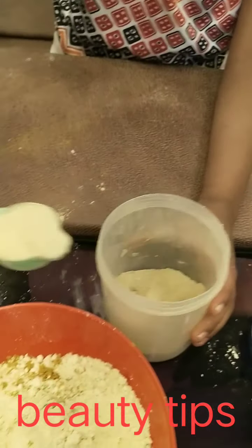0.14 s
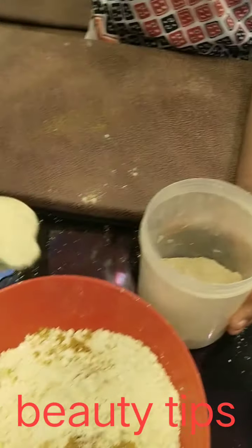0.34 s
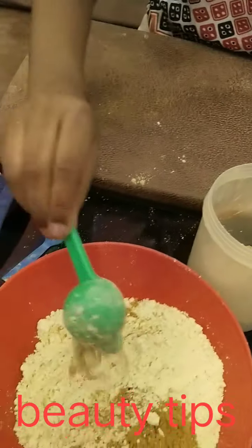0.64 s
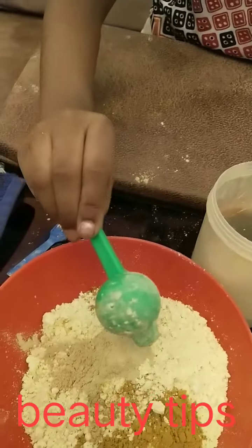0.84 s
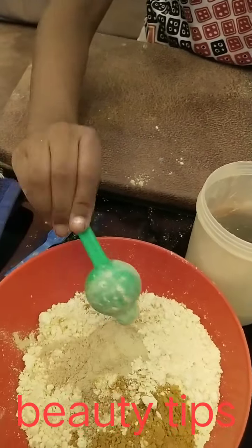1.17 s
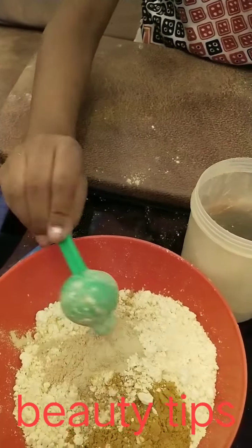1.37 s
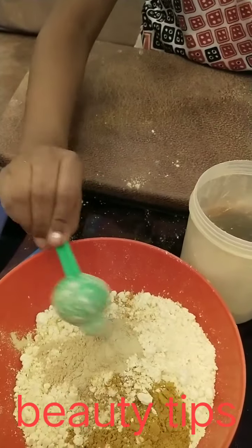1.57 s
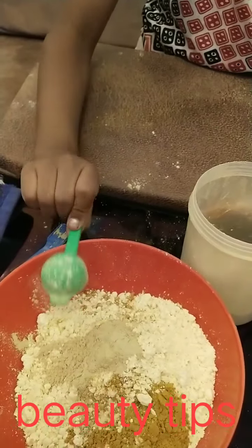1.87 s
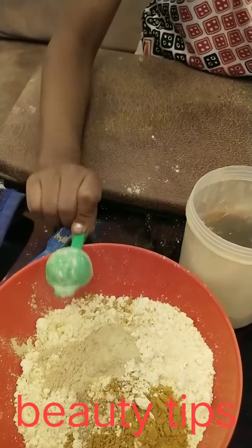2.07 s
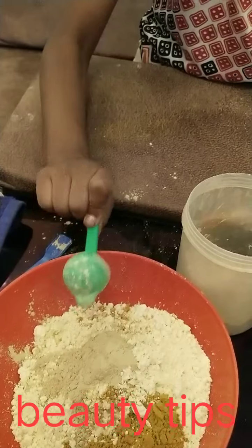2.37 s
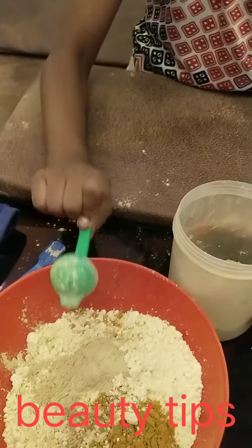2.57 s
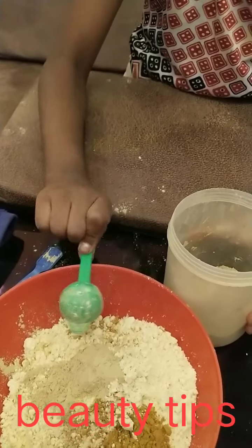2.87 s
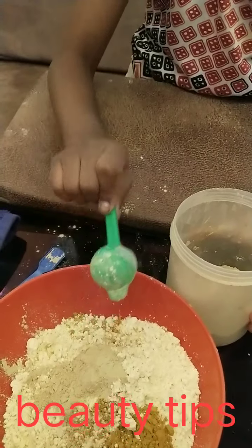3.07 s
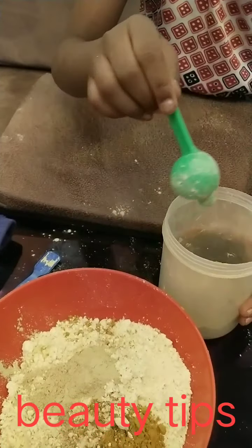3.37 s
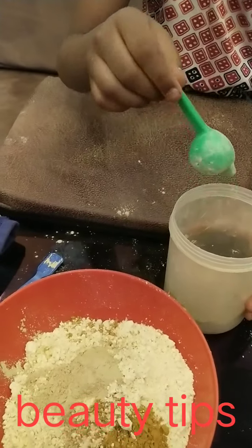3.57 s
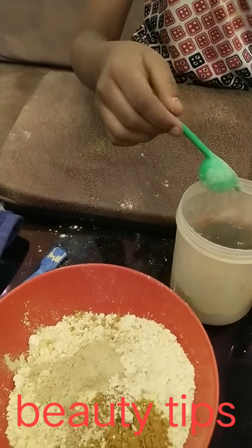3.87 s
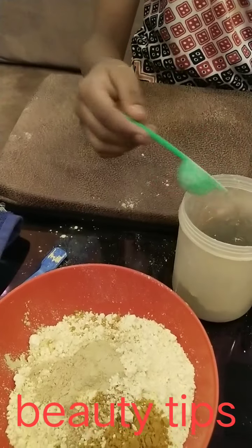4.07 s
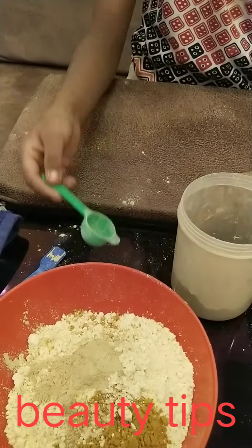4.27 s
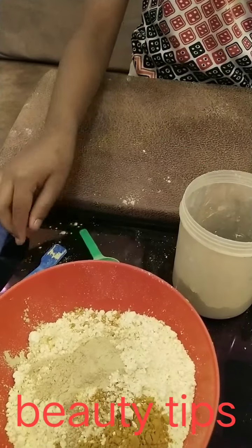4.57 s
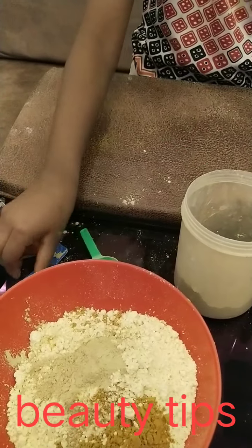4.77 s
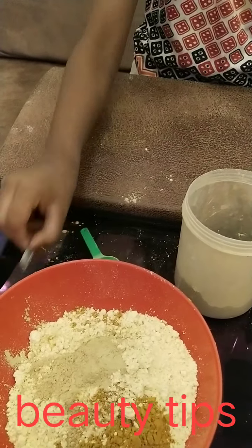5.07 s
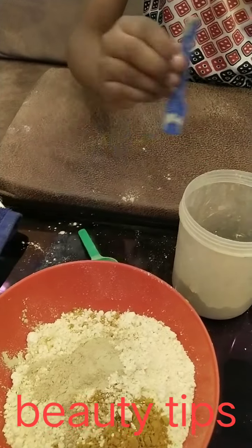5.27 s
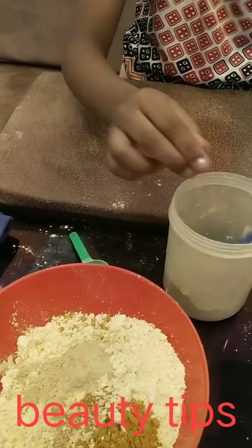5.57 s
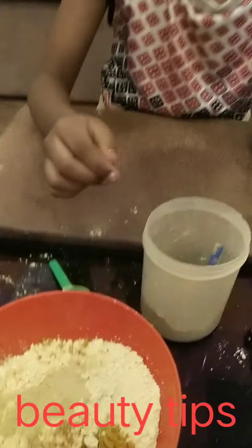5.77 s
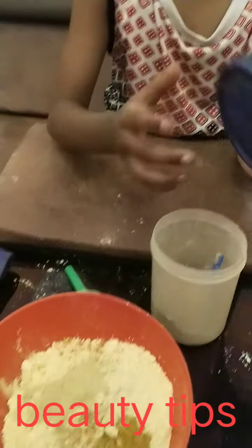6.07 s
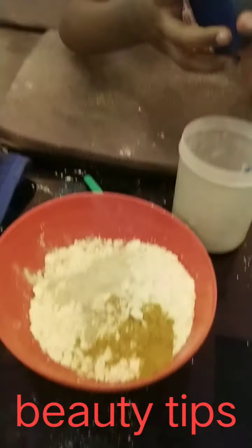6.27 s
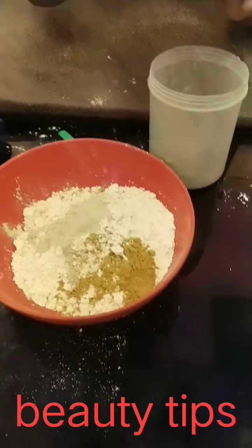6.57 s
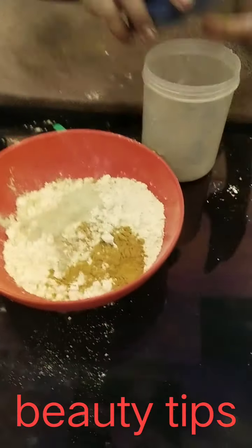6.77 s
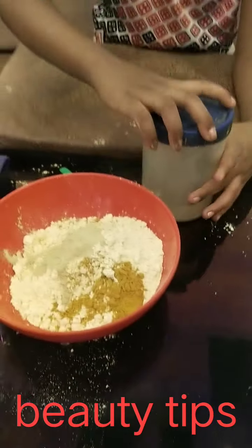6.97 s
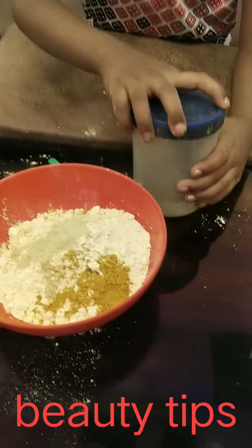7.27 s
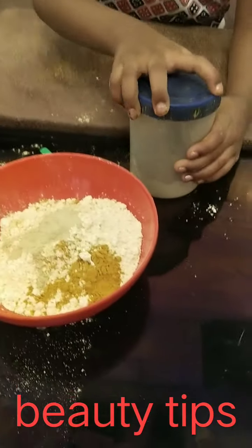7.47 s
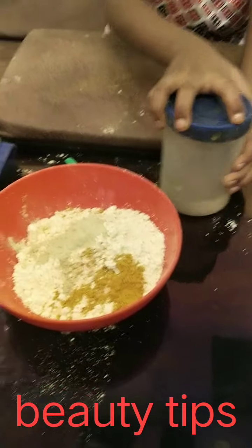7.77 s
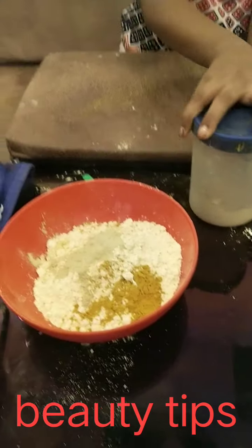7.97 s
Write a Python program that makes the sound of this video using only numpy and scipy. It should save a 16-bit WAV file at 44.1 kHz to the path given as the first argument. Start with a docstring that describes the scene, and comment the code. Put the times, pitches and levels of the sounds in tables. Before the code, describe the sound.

A plastic spoon taps a bowl of powder and drops on a table, then a lid is fumbled onto a plastic jar.

```python
"""A plastic spoon taps the rim of a bowl of powder, then drops and bounces on the table. A small scoop
clatters as it is picked up, and a lid is fumbled onto a plastic jar. Each blow rings the body's modes,
cracks at the contact and chatters. Hands and cloth rustle close by, with dry ticks and dull finger bumps.
An appliance hums and whines faintly over the hiss and rumble of a small hard-walled room."""
import sys
import numpy as np
from scipy import signal
from scipy.io import wavfile

SR = 44100
rng = np.random.default_rng(int(sys.argv[2]) if len(sys.argv) > 2 else 0)


def output_pcm(signal):
    """Save a mono or channel-first signal as 16-bit PCM at the path in sys.argv[1].

    Samples are clipped to [-1, 1] before scaling.
    """
    pcm = np.clip(np.atleast_2d(signal).T, -1, 1) * 32767
    wavfile.write(sys.argv[1], SR, np.round(pcm).astype(np.int16))


N = 358312


def from_db(db):
    """Decibels to gain."""
    return 10 ** (np.asarray(db) / 20)


def rms_one(x):
    """Scale to unit rms."""
    return x / np.sqrt(np.mean(x ** 2) + 1e-20)


def in_time(rows):
    """A (time [s], value) curve at every sample."""
    return np.interp(np.arange(N) / SR, *np.transpose(rows))


def at_hz(rows, hz, column=1):
    """Read a table on a log-frequency axis."""
    return np.interp(np.log(hz), np.log(np.array(rows)[:, 0]), np.array(rows)[:, column])


def panned(pan_db):
    """Left and right gains, pan_db apart."""
    return from_db([[pan_db / 2], [-pan_db / 2]])


def bandpass(x, edges_hz):
    """Butterworth band, 12 dB per octave skirts."""
    return signal.sosfilt(signal.butter(2, edges_hz, "band", fs=SR, output="sos"), x)


def drift(rate_hz):
    """Slow random curve, unit rms."""
    hop = 40
    pole = np.exp(-2 * np.pi * rate_hz * hop / SR)
    slow = signal.lfilter([1], [1, -2 * pole, pole * pole], rng.standard_normal(N // hop + 2002))[2000:]
    return np.interp(np.arange(N) / hop, np.arange(len(slow)), rms_one(slow))


def bands(noise):
    """Yield (centre Hz, stereo band); neighbouring bands use independent mid/side noise pairs."""
    # left-right likeness: (frequency [Hz], correlation [0..1])
    likeness = [(30, 0.49), (130, 1), (290, 0.84), (640, 0.38), (1400, 0.023), (15000, 0.02)]
    # balance: (frequency [Hz], left-right [dB])
    balance = [(30, 5.5), (200, 0.7), (1000, 1), (4000, 3.5), (15000, 4)]
    edges_hz = np.geomspace(25, 17500, 20)
    for k, (low, high) in enumerate(zip(edges_hz, edges_hz[1:])):
        mid, side = bandpass(noise[k % 2], [low, high])
        hz = np.sqrt(low * high)
        alike = at_hz(likeness, hz)
        stereo = np.sqrt(1 + alike) * mid + np.sqrt(1 - alike) * side * [[1], [-1]]
        yield hz, stereo * panned(at_hz(balance, hz))


def movement_gain(hz):
    """Rustle gain at one frequency: hand and cloth movements swell and fade, their powers add."""
    # (peak time [s], level [dB], 20 dB swell [s], 20 dB fade [s], tilt [dB/octave])
    moves = [(0.02, -67.5, 0.24, 0.62, 5), (0.38, -69, 0.19, 0.33, 3), (0.735, -63.5, 0.16, 0.1, -0.2),
             (1.04, -73, 0.05, .08, 6), (2.70, -64.5, 0.15, 0.22, -0.7), (3.57, -72, 0.51, .2, -2.5),
             (3.72, -64, 0.42, 0.23, -0.3), (4.595, -62.5, 0.022, 0.13, .1), (4.71, -63, 0.17, 0.14, -1.5),
             (4.93, -66, 0.13, .12, -0.5), (5.025, -63.5, 0.044, 0.07, 0.8), (5.22, -54, 0.11, 0.12, -1),
             (5.412, -50.5, 0.074, 0.073, 1.3), (5.69, -58, 0.23, 0.38, 4), (5.83, -42, 0.051, 0.036, 1.5),
             (6.03, -60.5, 0.36, 0.17, 2), (6.11, -59, 0.13, 0.33, 3), (6.525, -39.5, 0.084, 0.097, -2.5),
             (6.60, -64, .5, 0.38, 1), (6.75, -51.5, 0.12, 0.13, 1.3), (6.92, -52.5, 0.09, 0.14, 0.2),
             (7.18, -48, 0.02, 0.067, 1), (7.36, -51.5, 0.45, 0.26, -0.5), (7.69, -62.5, 0.13, 0.091, -1.5),
             (7.955, -56, 0.23, 0.17, -1.3), (8.03, -58.5, .1, .3, -0.5)]
    t = np.arange(0, N / SR + .004, .004)
    peak_s, db, swell_s, fade_s, tilt_db = np.transpose(moves)[:, :, None]
    drop_db = 20 * np.maximum((peak_s - t) / swell_s, (t - peak_s) / fade_s)
    gains = from_db(db + tilt_db * np.log2(hz / 3000) - drop_db)
    return np.interp(np.arange(N) / SR, t, np.sqrt(np.sum(gains ** 2, axis=0)))


def rustle():
    """Skin and cloth rub: grainy, flickering noise with one bright resonance."""
    # spectrum: (frequency [Hz], relative density [dB])
    colour = [(180, -29), (300, -39), (418, -45), (678, 0), (842, -2), (1430, -6), (2650, -6),
              (3700, -11.5), (5200, -12), (7400, -17), (14500, -24), (16000, -45.5)]
    grains = rng.standard_normal((2, 2, N)) * from_db(2.3 * rng.exponential(1, N))
    layers = [(hz, band * from_db(at_hz(colour, hz) + 1.4 * drift(42.6))) for hz, band in bands(grains)]
    rubbing = sum(movement_gain(hz) * band for hz, band in layers)
    rubbing /= np.std(sum(band for _, band in layers))
    return rubbing + signal.lfilter(*signal.iirpeak(6400, Q=6.6, fs=SR), rubbing)


def rumble():
    """Low noise, each band wandering slightly in level."""
    # envelope: (time [s], level [dB])
    level = [(0.0, -58.5), (1.3, -58.5), (2.05, -55.5), (3.1, -59), (4.14, -57), (4.9, -59.5), (5.3, -55.5),
             (6.0, -55), (6.33, -58), (6.67, -57.5), (8.12, -57)]
    # spectrum: (frequency [Hz], relative density [dB])
    colour = [(15, -47), (25, -11), (69, -15.5), (151, -2.5), (237, -9.5), (263, 2), (292, 2), (320, -11),
              (389, -6), (413, -29), (900, -14.5), (1170, -48), (1980, -120)]
    noise = sum(band * from_db(at_hz(colour, hz) + 0.59 * drift(1.15))
                for hz, band in bands(rng.standard_normal((2, 2, N))) if hz < 900)
    return from_db(in_time(level)) * rms_one(noise)


def room_hiss(level_db=-65):
    """Steady coloured noise."""
    # spectrum: (frequency [Hz], relative density [dB])
    colour = [(180, -32), (300, -2), (392, -4), (440, -15), (494, -6), (555, -15.5), (1460, -9.5),
              (1610, -12), (2070, -14.5), (6620, -27), (14200, -35), (15200, -29.5), (16000, -63)]
    noise = sum(band * from_db(at_hz(colour, hz))
                for hz, band in bands(rng.standard_normal((2, 2, N))) if hz > 400)
    return from_db(level_db) * rms_one(noise)


def wavering(tones):
    """Unsteady tones: noise twice through a narrow resonance."""
    out = 0
    for hz, db, width_hz in tones:
        radius = np.exp(-np.pi * width_hz / SR)
        poles = [1, -2 * radius * np.cos(2 * np.pi * hz / SR), radius * radius]
        once = signal.lfilter([1], poles, rng.standard_normal(N + SR))
        out = out + from_db(db) * rms_one(signal.lfilter([1], poles, once)[SR:])
    return out


def appliance():
    """Low hum plus a faint whine that slowly changes level."""
    # hum tones: (frequency [Hz], level [dB], width [Hz])
    hum = [(95.5, -71, 15), (169.5, -71, 43), (194, -64.5, 1.36), (232.8, -65.5, 24), (287.4, -65, 4.4),
           (377, -72, 3.6), (507, -74.5, 4.4)]
    # whine tones: (frequency [Hz], relative level [dB], width [Hz])
    whine = [(1623, -3.5, 11.7), (1855, -6.5, 7.7)]
    # whine envelope: (time [s], gain [dB])
    whine_gain = [(0.0, -71), (1.3, -73.5), (2.4, -74.5), (3.0, -76), (4.6, -78), (6.4, -72.5), (8.12, -75)]
    return (wavering(hum) + from_db(in_time(whine_gain)) * wavering(whine)) * panned(2.9)


def struck(blows, modes, lag_s, crack_hz, chatter_db, chatter_t60_s):
    """Each blow rings the modes, cracks and chatters in tiny touches; the right ring lags by lag_s."""
    # shading of the ring: (frequency [Hz], multiplier on the blow's pan [1])
    shading = [(80, 0.86), (300, 0.098), (700, 1.2), (1290, 0.11), (2400, 2.6), (15000, 5.7)]
    build_s, scatter_db, touches_per_s = 0.00012, 2.0, 700
    crack_t60_s, crack_side, crack_pan_db = .011, 0.59, 4.5
    out, t = np.zeros((2, N)), np.arange(SR // 6) / SR
    hz, mode_db, t60_s = np.transpose(modes)
    sign = (-1.) ** np.arange(len(modes))   # neighbouring modes start in opposite senses
    envelope = from_db(-60 * t / t60_s[:, None]) * (1 - np.exp(-t / build_s))   # contact loads the wall
    left, right = (envelope * np.sin(2 * np.pi * hz[:, None] * (t - delay_s)) for delay_s in (0, lag_s))
    scatters = scatter_db * rng.standard_normal((len(blows), len(modes)))
    cracks = rms_one(bandpass(rng.standard_normal((len(blows), 2, len(t))), crack_hz))
    touches = rng.standard_normal((len(blows), len(t)))
    touches *= rng.random(touches.shape) < touches_per_s / SR
    touches = touches * from_db(chatter_db - 60 * t / chatter_t60_s) + (t == 0)   # main hit at t = 0
    for row, scatter, (mid, side), touch in zip(blows, scatters, cracks, touches):
        start_s, db, tilt_db, crack_db, pan_db = row
        gain = sign * from_db(mode_db + tilt_db * np.log2(hz / 1000) + scatter)
        shade = from_db(pan_db / 2 * at_hz(shading, hz))
        ring = np.array([gain * shade @ left, gain / shade @ right])
        ring /= np.max(np.abs(ring.mean(axis=0)))
        crack = (mid + crack_side * side * [[1], [-1]]) / np.hypot(1, crack_side)
        crack *= panned(crack_pan_db) * from_db(crack_db - 60 * t / crack_t60_s)
        blow = signal.fftconvolve(ring + crack, touch[None], axes=1)
        i = round(start_s * SR)
        out[:, i:i + blow.shape[1]] += from_db(db) * blow
    return out


def bowl_taps():
    """The spoon taps the rim; the bowl of powder rings briefly."""
    # (time [s], level [dB], tilt [dB/octave], crack [dB], pan [dB])
    taps = [(1.382, -9.5, 3, -9.5, 4), (1.389, -26.5, -2.5, -2, 18.5), (1.602, -13, 3, -11, 5.5),
            (1.843, -12.5, 2, -17.5, 6.5), (2.052, -13, 2, -15, 7), (2.294, -15, 2.5, -12.5, 6.5),
            (2.422, -19, 0.5, -15.5, 8.5)]
    # (frequency [Hz], level [dB], t60 [s])
    modes = [(104, -13.5, 0.088), (199, -4.5, 0.043), (363, -9, 0.032), (487, -15, 0.02), (690, -1, 0.033),
             (969, -4.5, 0.041), (1086, -2, 0.046), (1264, 3, 0.013), (1392, -1.5, 0.033),
             (1537, -2.5, 0.013), (2170, -1, 0.0054), (2960, -11, 0.0065), (3350, -10.5, 0.0042),
             (4040, -9, 0.0021), (4900, -8.5, 0.0039), (4840, -28, 0.012), (5560, -18.5, 0.0035)]
    return struck(taps, modes, lag_s=82e-6, crack_hz=(1500, 8000), chatter_db=-18.5, chatter_t60_s=0.048)


def spoon_drop():
    """The spoon hits the table, rings and bounces."""
    # (time [s], level [dB], tilt [dB/octave], crack [dB], pan [dB])
    bounces = [(3.9305, -13, -1.1, -21, 4.1), (4.2947, -48.5, -1.1, -14, 2.6),
               (4.5905, -46.5, 0.92, -24, 4.2)]
    # (frequency [Hz], level [dB], t60 [s])
    modes = [(174, -20.5, 0.021), (404, -20, 0.041), (644, -21, 0.021), (815, -9.5, 0.03),
             (1000, -1.5, 0.014), (1060, -30, 0.036), (1133, -21, 0.13), (1510, -1.5, 0.0079),
             (1860, -11, 0.053), (2140, -5, 0.031), (2378, 1, 0.047), (2422, 6.5, 0.022), (3126, -3, 0.013),
             (3230, -13, 0.059), (3705, -0.5, 0.011), (4480, -6.5, 0.013), (5040, -16, 0.02),
             (6230, -7.5, 0.004), (7400, -21, 0.013)]
    return struck(bounces, modes, lag_s=80e-6, crack_hz=(2800, 12000),
                  chatter_db=-14.5, chatter_t60_s=0.21)


def handle_slaps():
    """The bouncing spoon's handle slaps the table and rings its own modes."""
    # (time [s], level [dB], tilt [dB/octave], crack [dB], pan [dB])
    slaps = [(4.0214, -18.5, 1.5, -9.5, 4), (4.1125, -24, 3, -13.5, 3.5), (4.147, -36.5, -0.5, -13, 3),
             (4.46, -58, 4, -14, 4), (4.612, -55, -5, -23, 14)]
    # (frequency [Hz], level [dB], t60 [s])
    modes = [(413, -20, 0.058), (965, -2.5, 0.022), (1135, -7, 0.066), (1450, 0.5, 0.0085),
             (2460, -2.5, 0.02), (3220, 2, 0.014), (3530, 2, 0.021), (3800, 3, 0.0067),
             (4600, -2.5, 0.0053), (5250, -5.5, 0.0086), (5950, -3, 0.011), (6600, -4, 0.0059)]
    return struck(slaps, modes, lag_s=80e-6, crack_hz=(5000, 15000), chatter_db=-15.5, chatter_t60_s=0.14)


def dead_contacts(rows, t60_cycles, noise_gain):
    """Damped contacts: a short sine burst plus noise around the same pitch."""
    out, t = np.zeros((2, N)), np.arange(SR // 20) / SR
    for start_s, db, hz, pan_db in rows:
        noise = rms_one(bandpass(rng.standard_normal(len(t)), [hz / 2, hz * 2]))
        envelope = from_db(-60 * t * hz / t60_cycles) * np.minimum(2 * hz * t, 1)
        burst = (np.sin(2 * np.pi * hz * t) + noise_gain * noise) * envelope
        i = round(start_s * SR)
        out[:, i:i + len(t)] += from_db(db) * panned(pan_db) * burst
    return out


def finger_bumps():
    """A finger bumps dully near the left microphone port."""
    # (time [s], level [dB], centre [Hz], left-right [dB])
    bumps = [(4.305, -29, 201, 3), (5.411, -29, 605, 15), (5.8355, -26.5, 236, 31), (5.852, -24.5, 705, 21),
             (5.945, -39, 293, 24), (7.43, -30, 459, 6)]
    return dead_contacts(bumps, t60_cycles=2.8, noise_gain=0.4)


def dry_ticks():
    """Nails, threads and crumbs tick, mostly on the left."""
    # (time [s], level [dB], centre [Hz], left-right [dB])
    ticks = [(5.0196, -55, 3450, 10), (5.361, -49, 5000, 21), (5.412, -51, 3080, 16),
             (5.687, -46, 5750, 27), (5.831, -34, 6050, 21), (5.8525, -28, 5030, 30),
             (5.843, -38, 8000, 20), (6.034, -49.5, 1900, 14), (6.1055, -45, 1690, 9),
             (6.137, -40, 1950, 8), (6.4975, -17.5, 3150, 13.5), (6.4985, -21.5, 5340, 3),
             (6.531, -28, 1860, -3), (6.901, -59, 9000, -13), (7.049, -52, 8000, 14),
             (7.1745, -45, 2100, 5)]
    return dead_contacts(ticks, t60_cycles=15.4, noise_gain=0.14)


def scoop_pickup():
    """A small plastic scoop knocks and clatters lightly as it is picked up."""
    # (time [s], level [dB], tilt [dB/octave], crack [dB], pan [dB])
    knocks = [(5.132, -18.5, 1, -45, .6), (5.164, -28, 23.5, -16, 1.3), (5.213, -43, 3, -15, 2.4),
              (5.232, -50, 4, -21, 1.5)]
    # (frequency [Hz], level [dB], t60 [s])
    modes = [(422, 0, 0.011), (826, 3.5, 0.024), (1170, -2.5, 0.021), (1500, -3, 0.023), (2040, -4, 0.0068),
             (2470, -12, 0.014), (3340, -3, 0.0056), (4900, -17, 0.0059), (6480, -15, 0.0054)]
    return struck(knocks, modes, lag_s=50e-6, crack_hz=(3000, 12000), chatter_db=-22, chatter_t60_s=0.035)


def lid_fumble():
    """The lid meets the jar: a cluster of low knocks, then one more."""
    # (time [s], level [dB], tilt [dB/octave], crack [dB], pan [dB])
    knocks = [(6.447, -20, 4, -28, 1.9), (6.458, -22.5, 7, -25, 2.3), (6.479, -31, -8, -33, 2.2),
              (6.489, -25.5, 3.5, -36, 1.6), (6.501, -26, -11, -5.5, 2.2), (6.512, -32, -15, -28, 1.7),
              (6.520, -30, -8, -35, 1.6), (6.532, -36, -5, 2.5, 1.8), (6.554, -29.5, -8.5, -7.5, 2.2),
              (7.175, -38, -5.5, -8, 1.8)]
    # (frequency [Hz], level [dB], t60 [s])
    modes = [(97, -32.5, 0.051), (156, -14.5, 0.081), (225, -7.5, 0.087), (290, 0.5, 0.022), (462, 1, 0.05),
             (502, 6, 0.026), (590, 10.5, 0.027), (699, 3.5, 0.025), (980, -23, 0.018), (1630, -10, 0.0076),
             (2140, -19, 0.0047), (2930, -32, 0.0082)]
    return struck(knocks, modes, lag_s=390e-6, crack_hz=(1000, 5000), chatter_db=-16, chatter_t60_s=0.034)


def room(send):
    """Reflections as noise dying band by band: a quick early part over a long tail."""
    # tail: (frequency [Hz], t60 [s], level [dB])
    tail = [(156, 0.67, -36.5), (300, 0.33, -30.5), (720, 0.55, -40.5), (1350, 0.46, -43),
            (2620, 0.49, -45), (5200, 0.41, -40), (12200, 0.39, -42.5)]
    early_t60_s, early_db, table_echo_s = 0.074, 5, .0025
    t = np.arange(SR) / SR
    early = from_db(early_db - 60 * t / early_t60_s)
    response = sum(band * from_db(at_hz(tail, hz, column=2)) * (early + from_db(-60 * t / at_hz(tail, hz)))
                   for hz, band in bands(rng.standard_normal((2, 2, SR))))
    response *= np.clip((t - table_echo_s) / 0.00083, 0, 1)
    return signal.fftconvolve(send.mean(axis=0, keepdims=True), response, axes=1)[:, :N]


def scene():
    """Blows and their echoes over rustle and steady sounds."""
    spoon = spoon_drop() + handle_slaps()
    blows = bowl_taps() + scoop_pickup() + lid_fumble()
    ticks, bumps = dry_ticks(), finger_bumps()
    drone = appliance()
    # the dropped spoon drives the room harder; ticks by the left port barely do, so send their right side
    echoes = room(blows + from_db(4.5) * spoon + 1.4 * ticks[1])
    return blows + spoon + ticks + bumps + echoes + rustle() + rumble() + room_hiss() + drone


def record(dry):
    """The microphone drops the deep bass; the top is cut steeply."""
    body = signal.sosfilt(signal.butter(2, 55, "high", fs=SR, output="sos"), dry)
    return signal.sosfilt(signal.cheby2(12, 70, 16700, fs=SR, output="sos"), body)


dry = scene()
out = record(dry)
output_pcm(out)
```